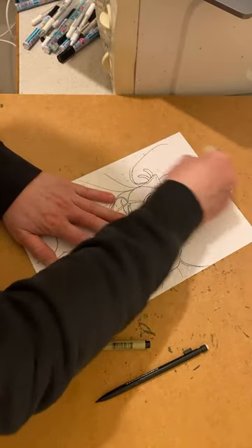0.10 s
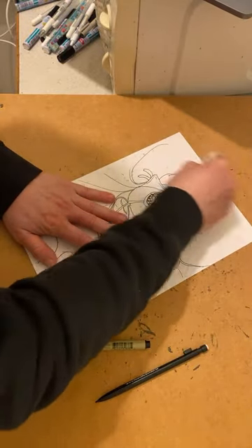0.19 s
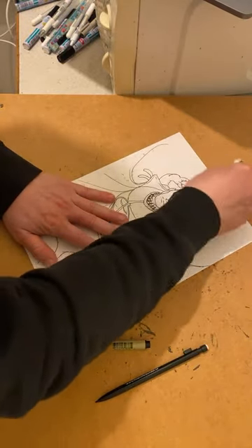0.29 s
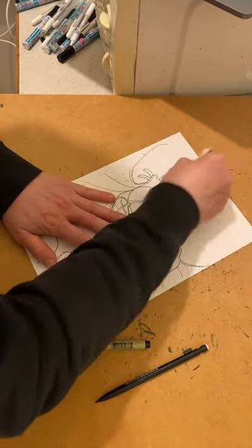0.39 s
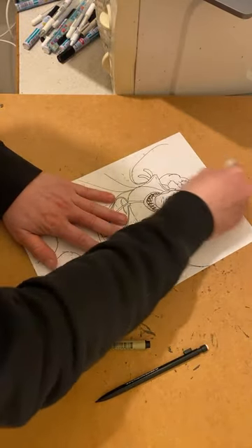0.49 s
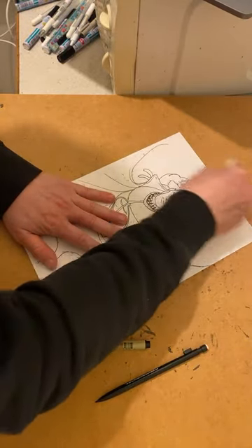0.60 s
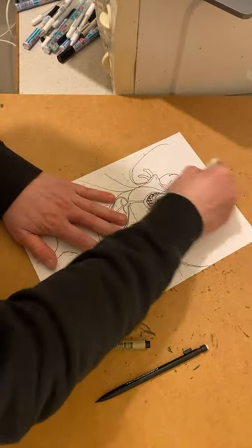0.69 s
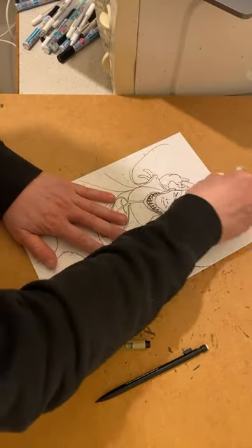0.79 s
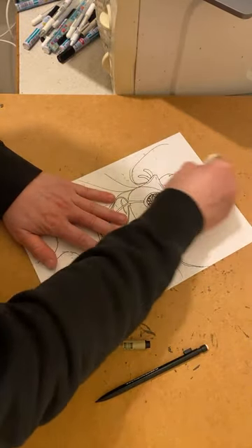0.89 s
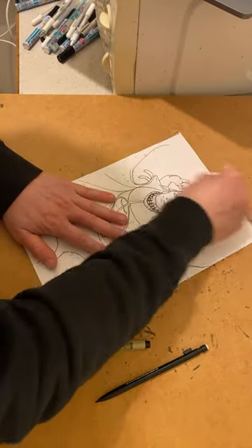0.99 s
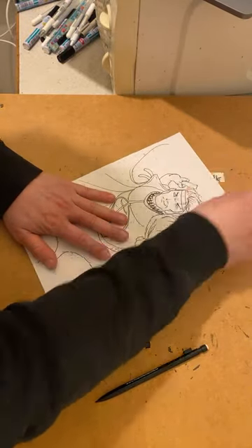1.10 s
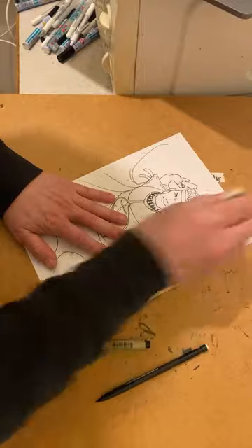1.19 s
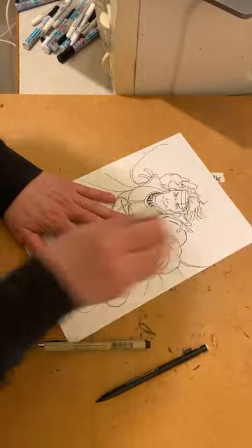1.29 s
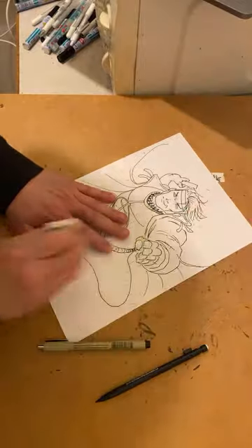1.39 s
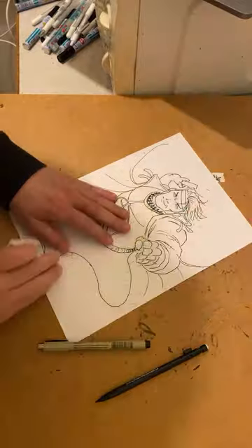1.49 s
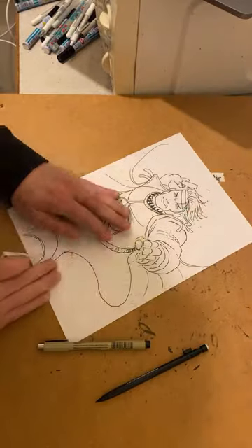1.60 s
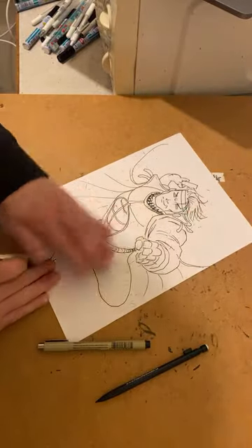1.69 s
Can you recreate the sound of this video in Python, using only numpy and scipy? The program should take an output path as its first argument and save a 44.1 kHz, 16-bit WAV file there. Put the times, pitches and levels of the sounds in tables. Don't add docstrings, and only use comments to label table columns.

```python
import sys
import numpy as np
from scipy import signal
from scipy.fft import rfft, irfft
from scipy.io import wavfile
from scipy.ndimage import uniform_filter1d

SR = 44100
rng = np.random.default_rng(int(sys.argv[2]) if len(sys.argv) > 2 else 0)


def transcribe(signal):
    frames = np.atleast_2d(signal).T
    limited = np.clip(frames, -1, 1)
    pcm = np.round(limited * 32767).astype(np.int16)
    wavfile.write(sys.argv[1], SR, pcm)


def invert_db(x):
    u = np.asarray(x, float) / 20
    return 10 ** u


N = 74970

# pitch_hz, level_db (per Hz)
ROOM_NOISE = [(18, -47), (30, 3), (161, -15.5), (437, -11.5), (721, -20), (889, -18.5), (1460, -25.5),
              (1860, -26), (16000, -41.5)]
# pitch_hz, level_db
HUM = [(49, -74), (98, -67.5), (147, -63.5), (244, -74.5)]
# pitch_hz, time_to_fall_60_db_s
ROOM_DECAY = [(1000, 0.37), (4000, 0.69), (9000, 0.28), (16000, 0.067)]
# start_s, pitch_hz, level_db, time_to_fall_60_db_s
TOUCHES = [(0, 45, -36.5, .06), (0.253, 60, -41, .1), (1.101, 426.4, -59, 0.51), (1.452, 1275, -50.5, 0.11),
           (1.468, 776, -56, 0.23), (1.517, 1200, -57, 0.11), (1.542, 1500, -51, 0.029),
           (1.59, 390.3, -56, 0.39), (1.666, 150, -48.5, 0.15), (1.687, 155, -44.5, 0.082),
           (1.662, 327, -49.5, 0.041)]
# peak_s, level_db, rise_s, fall_s (both to 20 dB under the peak)
PALM_WIPES = [
    (1.045, 6, .045, .06),
    (1.22, -9, .08, .12),
    (1.45, -10, .09, .12),
    (1.565, 0, .125, .17),
]
# pitch_hz, level_db (per Hz)
PALM_COLOUR = [(1000, -4), (2000, -15), (3500, -9.5), (8000, -9.5), (13400, -11.5), (15700, -19),
               (16200, -38)]
# peak_s, level_db, rise_s, fall_s (both to 20 dB under the peak)
FINGER_SWEEPS = [
    (1.086, 0, .055, .09),
]
# pitch_hz, level_db (per Hz)
FINGER_COLOUR = [(880, -22), (1500, -22), (2020, -19), (2860, -9.5), (4160, -11), (5880, -9), (6430, -9),
                 (14900, -25), (16000, -24)]
# pitch_hz, width_hz, level_db
SHEET = [(2900, 250, -4), (3700, 250, -6), (4930, 200, -4), (6000, 350, -5)]
# peak_s, level_db, rise_s, fall_s (both to 20 dB under the peak)
STROKES = [
    (.01, 0, .08, .115),
    (.283, 0, .07, .12),
    (.552, 0, .085, .125),
    (.803, 0, .07, .12),
]
# pitch_hz, level_db (per Hz)
ERASER_COLOUR = [(1500, 8), (3000, 3.5), (5000, 6), (7000, 0.5), (10000, 1), (14000, -4.5), (15600, -5),
                 (16200, -30)]
# start_s, strength_db, hardness_db, spliced (1 = a piece is lost inside)
KNOCKS = [
    (-.062, -24.5, 1.5, 0),
    (0.1988, -24, 0.5, 0),
    (0.4657, -18, 2.5, 0),
    (0.716, -21.5, 0.5, 0),
    (0.9893, -21.5, 1.5, 1),
]
# time_s, pitch_hz
THUD_PITCH = [(0, 350), (.008, 355), (.012, 435), (.021, 445), (.026, 335), (.05, 325)]
# pitch_hz, level_db, time_to_fall_60_db_s
DESK_TONES = [(116.5, -3, 0.43), (153.7, -3, 0.33), (260, -9, 0.1), (334.8, -7, 0.63), (376.3, -12.5, 1),
              (431.6, -10.5, 1), (488.6, 4.5, 0.12), (567, -11.5, 0.63), (620, -35, .25), (768, -30, 0.36),
              (930, -38, .25), (1077, -17, 0.6), (1660, -24, 0.66)]
# pitch_hz, level_db (per Hz)
TAIL_COLOUR = [(110, -5.5), (205, -18), (290, -1.5), (480, -1.5), (700, -13.5), (1400, -17), (2500, -30.5),
               (7000, -60)]
# pitch_hz, time_to_fall_60_db_s
TAIL_DECAY = [(80, 0.17), (300, 0.45), (1500, 0.49), (4000, .35)]
# from_s, to_s
GAPS = [
    (.2436, .2487),
    (.9640, .9742),
    (1.4838, 1.4851),
]

ROOM_NOISE_DB, ROOM_ANSWER_DB = -62, -15.5
ERASER_DB, FINGERS_DB, PALM_DB = -57.5, -41, -62
PRESS_ROUND_S, FLUTTER_DB = .012, .7
THUD_DB, RING_DB, TAIL_DB, TICK_DB, OVERTONE_DB = -0.5, -11, -7, -24.5, -24
THUD_RISE_S, THUD_HOLD_S, THUD_RELEASE_DB_PER_S = .003, .027, 1000
TAIL_RISE_S, TICK_S, HARD_HZ = .022, .012, 684
SLAP_S, SLAP_HZ, SLAP_DB = .0072, 1320, 1
KNUCKLE_S, KNUCKLE_HZ, KNUCKLE_DB = 0.00216, 1500, -11
SLAP_DECAY_S = .014
SPLICE_AFTER_S, SPLICE_LOST_S, SPLICE_FADE_S = .0046, .0101, .0005
SPLICE_CLICK_DB, SPLICE_BUMP_DB = -28, -23.5
LOW_CUT_HZ, TOP_HZ = 78, 16000


def evened(x):
    return x / np.sqrt(np.mean(x ** 2) + 1e-20)


def read(points, hz):
    f, value = np.transpose(points)
    return np.interp(np.log(hz + 1), np.log(f + 1), value)


def add(mix, s, sound):
    at = round(s * SR)
    sound = sound[max(-at, 0):]
    part = mix[max(at, 0):][:len(sound)]
    part += sound[:len(part)]


def coloured(x, points):
    gain = invert_db(read(points, np.fft.rfftfreq(len(x), 1 / SR)))
    return irfft(rfft(x) * gain, len(x))


def resonate(x, hz, width):
    r = np.exp(-np.pi * width / SR)
    pole = r * np.exp(2j * np.pi * hz / SR)
    return 2 * signal.lfilter([1 - r], [1, -pole], x).real


def dying(x, decay):
    hz, frame, z = signal.stft(x, SR, nperseg=512)
    fade = invert_db(-60 * frame / read(decay, hz)[:, None])
    return signal.istft(z * fade, SR, nperseg=512)[1][:len(x)]


def friction(rows, per_s, spread_db, order):
    t = np.arange(N) / SR
    happens = rng.random(N) < per_s / SR
    size = invert_db(spread_db * np.minimum(rng.exponential(1, N), 4))
    slips = happens * size * rng.standard_normal(N)
    flutter = uniform_filter1d(rng.standard_normal(N), size=300)
    flutter = evened(uniform_filter1d(flutter, size=300))
    press = np.zeros(N)
    for s, db, rise, fall in rows:
        distance = abs(t - s) / np.where(t < s, rise, fall)
        press += invert_db(db - 20 * distance ** order)
    press = uniform_filter1d(press, round(PRESS_ROUND_S * SR))
    return evened(slips), press * invert_db(FLUTTER_DB * flutter)


def room():
    t = np.arange(N) / SR
    out = invert_db(ROOM_NOISE_DB) * evened(coloured(rng.standard_normal(N), ROOM_NOISE))
    for hz, db in HUM:
        steady = np.sin(2 * np.pi * (hz * t + rng.random()))
        waver = evened(resonate(rng.standard_normal(N), hz, 22.0))
        out += invert_db(db) * (steady + 0.65 * waver)
    return out


def walls(x):
    echoes = dying(rng.standard_normal(SR), ROOM_DECAY)
    return invert_db(ROOM_ANSWER_DB) * signal.fftconvolve(x, echoes / np.linalg.norm(echoes))[:N]


def touches():
    t, out = np.arange(SR // 3) / SR, np.zeros(N)
    for s, hz, db, t60 in TOUCHES:
        rough = evened(resonate(rng.standard_normal(len(t)), hz, 0.22 * hz))
        ring = np.sin(2 * np.pi * hz * t) + 0.59 * rough
        add(out, s, np.clip(t / 0.0055, 0, 1) * invert_db(db - 60 * t / t60) * ring)
    return out


def palm():
    slips, press = friction(PALM_WIPES, per_s=24000, spread_db=1.0, order=2)
    return evened(coloured(slips, [(200, -27)] + PALM_COLOUR)) * press


def fingers():
    slips, press = friction(FINGER_SWEEPS, per_s=15000, spread_db=-0.2, order=1)
    hiss = coloured(slips, [(300, -46)] + FINGER_COLOUR)
    paper = sum(invert_db(db) * resonate(hiss, hz, width) for hz, width, db in SHEET)
    return evened(hiss + paper) * press


def eraser():
    slips, press = friction(STROKES, per_s=25000, spread_db=1.0, order=2)
    return evened(coloured(slips, [(300, -43)] + ERASER_COLOUR)) * press


def panel_thud(t):
    turns = np.cumsum(np.interp(t, *np.transpose(THUD_PITCH))) / SR
    thud = -np.sin(2 * np.pi * turns) + invert_db(OVERTONE_DB) * np.sin(4 * np.pi * turns)
    release = invert_db(-THUD_RELEASE_DB_PER_S * np.maximum(t - THUD_HOLD_S, 0))
    return thud * np.clip(t / THUD_RISE_S, 0, 1) * release


def desk_blow(t):
    ring = sum(invert_db(db - 60 * t / t60) * np.sin(2 * np.pi * hz * t) for hz, db, t60 in DESK_TONES)
    tail = dying(evened(coloured(rng.standard_normal(SR), TAIL_COLOUR)), TAIL_DECAY)
    late = np.clip(t / TAIL_RISE_S, 0, 1)
    tick = resonate(rng.standard_normal(SR), 2200, 3000.)
    tick = resonate(tick, 2200, 3000.) * np.exp(-t / TICK_S) * np.clip(t / .0005, 0, 1)
    body = invert_db(THUD_DB) * panel_thud(t) + invert_db(TICK_DB) * tick
    body += (invert_db(RING_DB) * ring + invert_db(TAIL_DB) * tail) * late
    for s, hz, db in (SLAP_S, SLAP_HZ, SLAP_DB), (KNUCKLE_S, KNUCKLE_HZ, KNUCKLE_DB):
        u = np.maximum(t - s, 0)
        fade = np.clip(u * hz, 0, 1) * invert_db(db - 60 * u / SLAP_DECAY_S)
        body += fade * np.sin(2 * np.pi * hz * u)
    return body


def desk():
    t = np.arange(SR) / SR
    body = desk_blow(t)
    high = signal.sosfilt(signal.butter(2, HARD_HZ, "high", fs=SR, output="sos"), body)
    past = np.clip((t - SPLICE_AFTER_S) / SPLICE_FADE_S, 0, 1)
    out = np.zeros(N)
    for s, db, hard_db, spliced in KNOCKS:
        knock = invert_db(db) * (body + (invert_db(hard_db) - 1) * high)
        jumped = np.interp(t + SPLICE_LOST_S * round(spliced), t, knock)
        add(out, s, (1 - past) * knock + past * jumped)
    return out


def scene():
    rub = invert_db(PALM_DB) * palm() + invert_db(FINGERS_DB) * fingers() + invert_db(ERASER_DB) * eraser()
    return np.tile(room() + walls(rub) + touches() + rub + desk(), (2, 1))


def band_limit(x):
    return signal.sosfilt(signal.butter(12, 16510, fs=SR, output="sos"), x)


def record(dry):
    t = np.arange(N) / SR
    x = signal.sosfilt(signal.butter(2, LOW_CUT_HZ, "high", fs=SR, output="sos"), dry)
    for a, b in GAPS:
        x = x * np.clip(np.maximum(a - t, t - b) / .0004, 0, 1)
    u = t - KNOCKS[-1][0] - SPLICE_AFTER_S
    click = invert_db(SPLICE_CLICK_DB) * np.exp(-abs(u) / .00015)
    bump = invert_db(SPLICE_BUMP_DB) * np.exp(-abs(u) / 0.00342) * np.clip(u / SPLICE_FADE_S, 0, 1)
    x = x + (u > 0) * (click + bump)
    x = signal.oaconvolve(x, signal.firwin(255, TOP_HZ, fs=SR)[None], "same")
    return band_limit(x)


dry = scene()
out = record(dry)
transcribe(out)
```